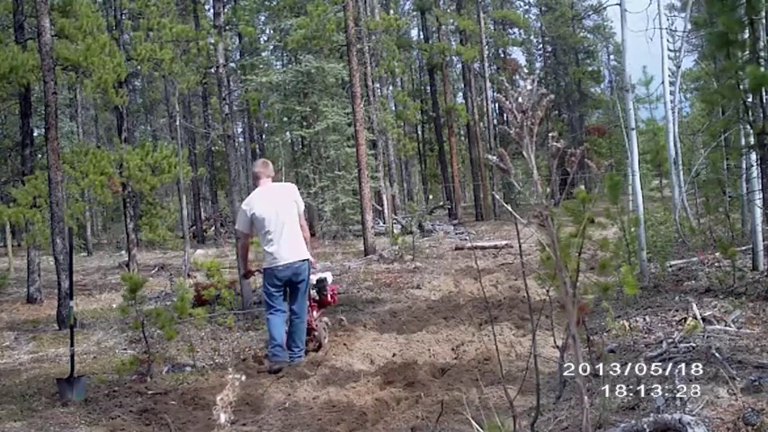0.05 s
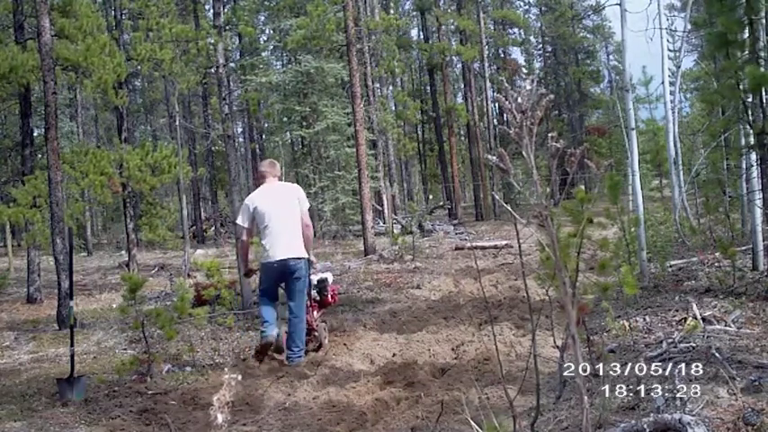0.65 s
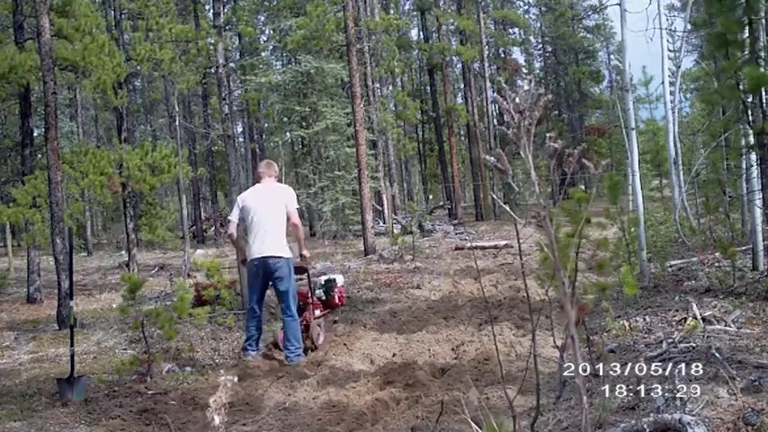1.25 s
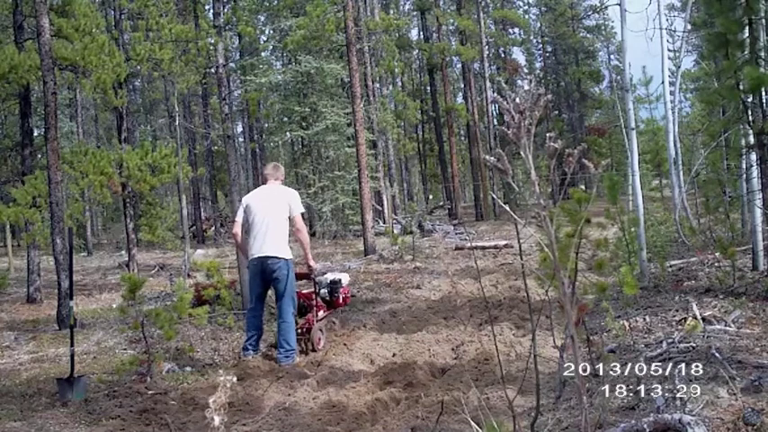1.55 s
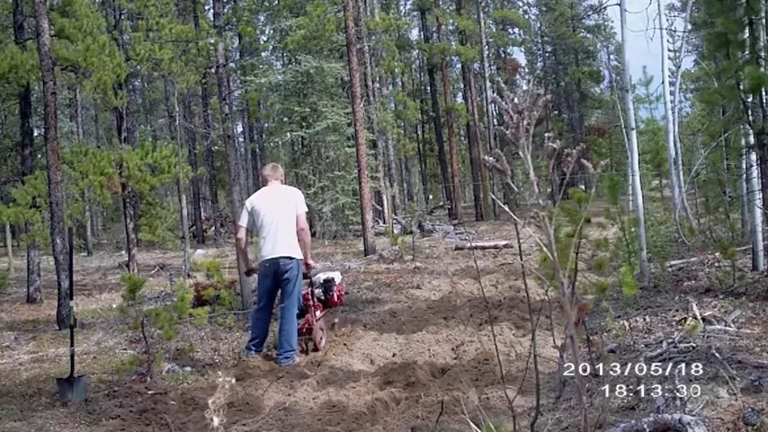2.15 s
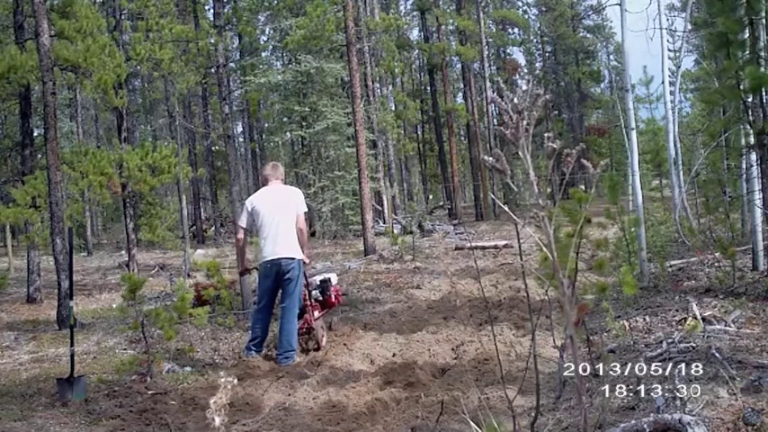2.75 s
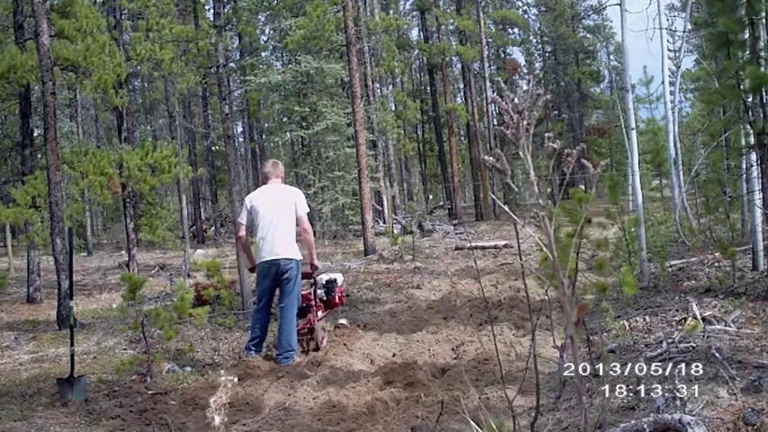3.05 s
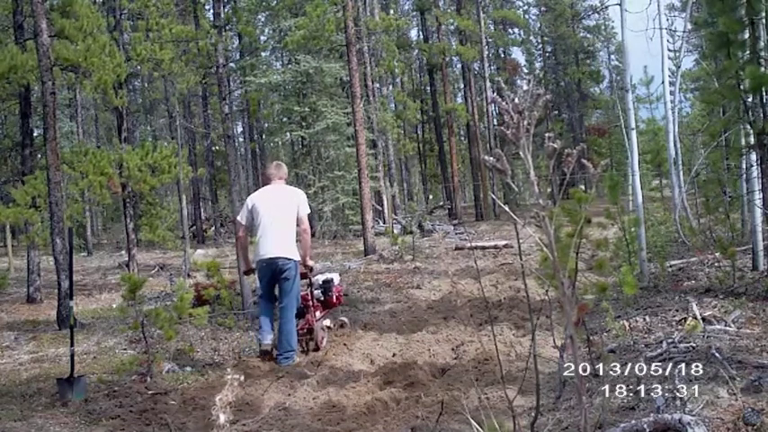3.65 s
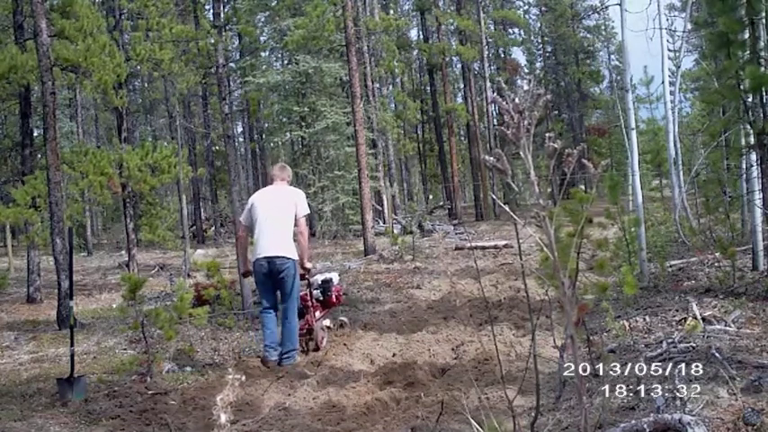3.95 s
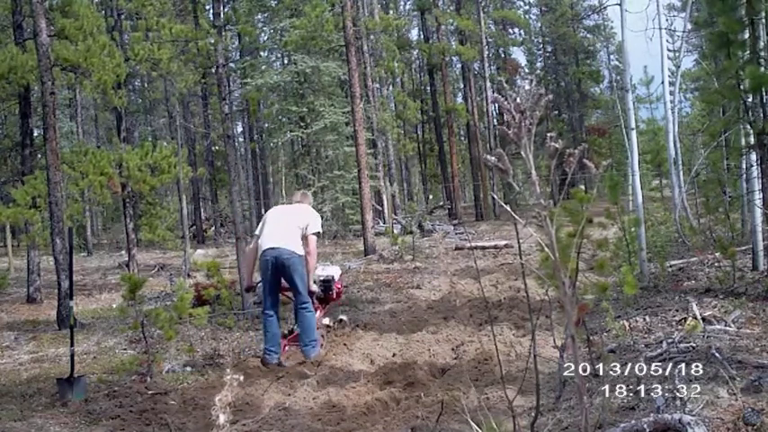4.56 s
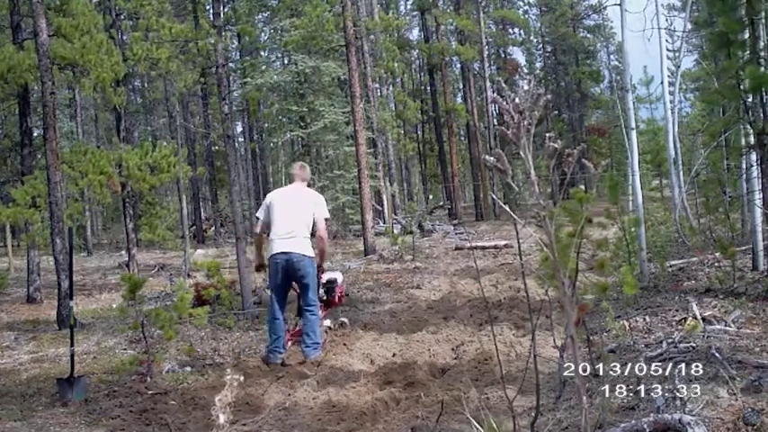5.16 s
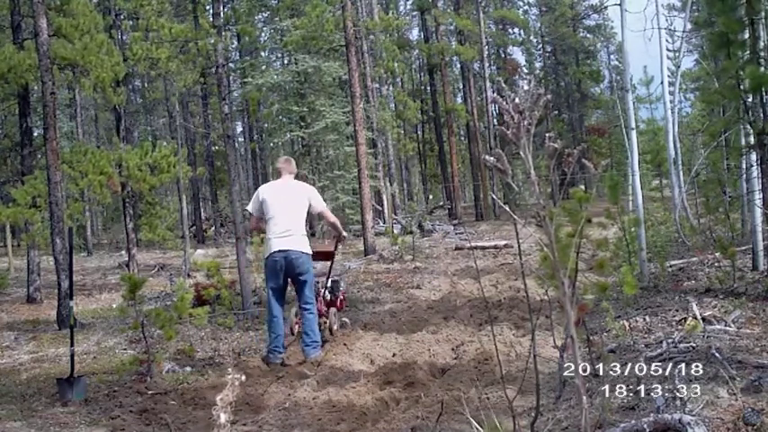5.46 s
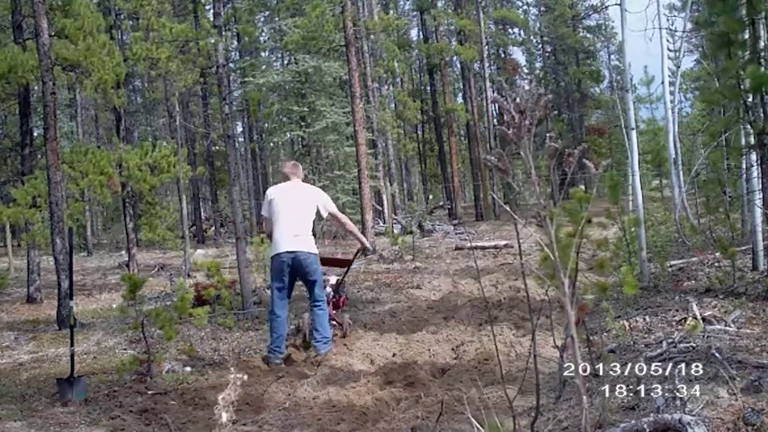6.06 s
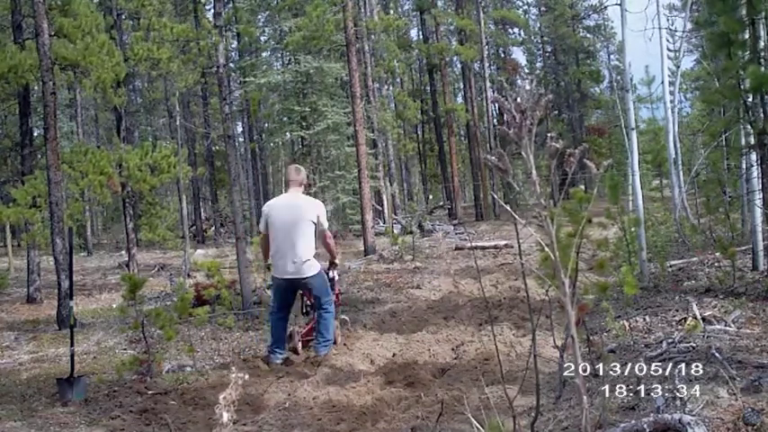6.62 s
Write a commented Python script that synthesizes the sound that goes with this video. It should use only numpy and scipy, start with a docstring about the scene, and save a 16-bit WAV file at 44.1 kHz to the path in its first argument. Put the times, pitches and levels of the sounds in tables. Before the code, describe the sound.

A garden tiller's small petrol engine idles in a forest clearing, its tin guard rattling. After about two seconds it is switched off and coasts down, chuffing and knocking ever slower and softer, with tiny squeaks, dry crackles and a few last gear clacks. A loose metal part clinks faintly. Wind sighs in the pines throughout, and gusts rumble and thump on the microphone before dying down near the end.

```python
"""A garden tiller's single-cylinder four-stroke idles in a forest clearing, its tin guard rattling.
Wind sighs in the pines throughout; from about 1 s gusts buffet the microphone.
At 2.2 s the ignition is cut: friction slows the crank, and the engine knocks and chuffs once a cycle,
ever slower and softer. It squeaks, then crackles as its slack gear clacks to a stop.
At 5.3 s a loose part clinks, and the gusts die down."""
import sys
import numpy as np
from scipy import signal
from scipy.fft import rfft, irfft, next_fast_len
from scipy.io import wavfile
from scipy.ndimage import uniform_filter1d, map_coordinates

SR = 44100
rng = np.random.default_rng(int(sys.argv[2]) if len(sys.argv) > 2 else 0)


def generate_wav(signal):
    """Clip the signal to [-1, 1] and save it as 16-bit WAV at the path in sys.argv[1]."""
    frames = np.transpose(np.atleast_2d(signal))
    scaled = np.clip(frames, -1, 1) * 32767
    pcm = np.round(scaled).astype(np.int16)
    wavfile.write(sys.argv[1], SR, pcm)


N = 299439
TIME = np.arange(N) / SR
IGNITION_OFF_S = 2.21
COAST_S, COAST_HZ = 2.2431, 29.857  # first chuff; engine speeds in Hz count cycles
AIR_BOX_HZ, AIR_BOX_WIDTH_HZ = 335.8, 31
# casing modes: (frequency [Hz], width [Hz], gain [dB])
CASING = [(1116, 120, 7), (1750, 240, 2.5), (2050, 310, 5.5), (2396, 250, 7), (3280, 360, -16),
          (5470, 370, -7.5), (9100, 1000, -19.5)]


def firings(turns):
    """Each firing: exhaust beat in the muffler, sharp tick, gulp through the air box, frame hum."""
    # firing strength: (time [s], level [dB])
    effort = [(0, -24.5), (.6, -24), (1.1, -24.5), (1.4, -25), (1.8, -24), (2.2, -24.5)]
    at = firing_times(turns)
    scatter = rng.standard_normal((len(at), 3))
    db = np.interp(at, *np.transpose(effort))
    exhaust = puffs(at + .00036, db - .9 + .3 * scatter[:, 0], soft_s=.00104, hz=280, width_hz=215)
    intake = -puffs(at + .01026, db - 3.9 + .3 * scatter[:, 1], soft_s=.00159, hz=338, width_hz=30)
    tick = puffs(at - .0002, db - 16 + 2 * scatter[:, 2], soft_s=.00015, hz=1320, width_hz=1900)
    hoot = -puffs(at + .00939, db - 30, soft_s=.00017, hz=AIR_BOX_HZ, width_hz=AIR_BOX_WIDTH_HZ)
    frame_hum = puffs(at, db - 16, soft_s=.001, hz=180.2, width_hz=11.4)
    chambers = -muffler(at + .00862, db - 14.5 + .5 * scatter[:, 1])
    return exhaust + intake + tick + hoot + frame_hum + chambers


def coasting():
    """Unfired, the piston only pumps: soft push, boom, sharp suck at the muffler, air box hoot."""
    at, speed_hz = chuff_cycles()
    slowed = halvings(speed_hz)
    held_back = np.exp(-(at - at[0]) / .18)  # pumping takes time to build up
    push_at = at - .215 / speed_hz
    push = puffs(push_at, -26.5 - 6.8 * slowed, soft_s=.0011, hz=170, width_hz=260)
    stir_db = -43.5 - slowed - 28 * held_back
    stir = puffs(push_at, stir_db, soft_s=.0008, hz=AIR_BOX_HZ, width_hz=AIR_BOX_WIDTH_HZ)
    boom = -puffs(at - .054 / speed_hz, -22 - 16.5 * slowed, soft_s=.0009, hz=101, width_hz=270)
    leak_db = 47 * np.maximum(halvings(speed_hz, from_hz=14.1), 0)  # vacuum leaks away at low speed
    suck_db = -16.5 - 22 * slowed - 13 * held_back - leak_db
    suck = -puffs(at, suck_db + 8.5, soft_s=.0003, hz=68.4, width_hz=180) - muffler(at, suck_db)
    outlet = signal.butter(4, 800, fs=SR, output="sos")
    suck = signal.sosfiltfilt(outlet, suck)
    draw_db = -16 - 22 * slowed - 30.6 * held_back
    gulp = -puffs(at + .267 / speed_hz, draw_db - .5, soft_s=.00028, hz=106, width_hz=83)
    hoot = -puffs(at + .2793 / speed_hz, draw_db, soft_s=.00073, hz=AIR_BOX_HZ, width_hz=AIR_BOX_WIDTH_HZ)
    chuff = push + boom + suck + gulp
    # the first chuffs lack a band and sound hollow
    missing_band = np.interp(TIME, [2.37, 2.45], [1, 0]) * resonance(chuff, hz=262, width_hz=55)
    return chuff - missing_band + stir + hoot


def muffler(at, db):
    """A sharp pressure change rings the chambers, slightly differently each time."""
    # chamber and outlet modes: (frequency [Hz], width [Hz], gain [dB])
    modes = [(472, 26, -12.5), (510, 60, -16.5), (609, 78, -7.5), (646, 36, -14), (694, 23, -14.5)]
    scatter_db = .5 * rng.standard_normal((len(at), len(modes)))
    return sum(puffs(at, db + gain_db + scatter_db[:, k], soft_s=.00026, hz=hz, width_hz=width_hz)
               for k, (hz, width_hz, gain_db) in enumerate(modes))


def clatter(turns):
    """Gear and cam contacts repeat through pulsing noise at idle; coasting, fluttering noise fades."""
    # clatter at full speed: (time [s], body [dB], hiss [dB])
    levels = [(0, -46, -52.5), (1.05, -44.5, -52.5), (1.35, -44, -49.5), (1.6, -41.5, -49),
              (2.03, -45.5, -51.5), (2.2, -44.5, -50.5), (2.4, -47.5, -50), (2.8, -49.5, -44.5)]
    # idle spectrum: (frequency [Hz], density [dB])
    idle_spectrum = [(300, 4), (400, -9), (480, 4), (660, -10.5), (800, -7), (1050, 0), (1350, -1),
                     (1750, 0), (2200, -3), (3000, -8.5), (3500, -14), (5200, -14.5), (7300, -20.5),
                     (8400, -17.5), (9800, -20), (14000, -43)]
    # coasting spectrum: (frequency [Hz], density [dB])
    coast_spectrum = [(300, -6.5), (750, -7.5), (1050, -5), (1600, 3.5), (2300, 0), (3000, -3),
                      (4000, -13.5), (6000, -14.5), (7500, -21.5), (9700, -21), (11500, -38), (14000, -44)]
    gears = contacts(2 * turns, count=735)  # two crank turns a cycle
    cam = contacts(turns, count=1470)
    idle = colour(from_db(-6.5) * rms_one(gears + cam) + rng.standard_normal(N), idle_spectrum)
    # swells after the exhaust beat, less on each half turn of the crank
    pulse_db = 1.2 * np.cos(2 * np.pi * (turns - .15)) + .8 * np.cos(8 * np.pi * turns)
    idle *= from_db(pulse_db + .6 * drift(25))
    coast = colour(rng.standard_normal(N), coast_spectrum)
    coast *= from_db(1.9 * drift(45) + .88 * drift(280) - 2.5)
    idle_share = np.interp(TIME, [2.25, 2.6], [1, 0])
    sound = np.sqrt(idle_share) * idle + np.sqrt(1 - idle_share) * coast
    hiss = signal.sosfiltfilt(signal.butter(2, 4000, "high", fs=SR, output="sos"), sound)
    body_db, hiss_db = in_time(levels)
    slowed = halvings(coast_speed_hz())
    return (sound - hiss) * from_db(body_db + 1 - 4 * slowed) + hiss * from_db(hiss_db + 8.5 - 8.5 * slowed)


def knocks():
    """The valves knock shut hard before some chuffs: scrape, clack, crack, casing ring, rattle."""
    # hard valve knocks: (time [s], clack [dB], pitch [Hz], crack [dB])
    hard_knocks = [(2.259, -39, 1830, -46), (2.3062, -38, 2180, -38), (2.3429, -37, 2110, -41),
                   (2.38, -34, 2150, -40), (2.4157, -43, 1750, -46), (2.4578, -32, 2010, -45),
                   (2.4984, -39, 2340, -44), (2.582, -36, 1870, -40), (2.6259, -33, 2100, -41),
                   (2.6725, -38, 1870, -44), (2.7193, -34, 1960, -48), (2.7671, -33.5, 2330, -38),
                   (2.82, -41, 2120, -42), (2.8723, -35.5, 2170, -53), (2.9297, -34.5, 2270, -52),
                   (2.9867, -47, 2400, -42), (3.049, -38, 2030, -49), (3.1153, -35, 2140, -52),
                   (3.1827, -45, 2030, -44), (3.2547, -38, 2470, -53), (3.335, -38, 1830, -48)]
    at, db, _, crack_db = np.transpose(hard_knocks)
    clack = sum(puffs([s], [clack_db], soft_s=.00002, hz=hz, width_hz=210) for s, clack_db, hz, _ in hard_knocks)
    ring = np.zeros(N)
    for k, (hz, width_hz, gain_db) in enumerate(CASING):
        ring_db = db - 15 + gain_db + rng.normal(0, 1.7, len(at))
        ring += (-1) ** k * puffs(at + .001216, ring_db, soft_s=.00002, hz=hz, width_hz=width_hz)
    scrape = bursts(at - .0035, db - 14, decay_s=.0033)
    tail = bursts(at + .0053, db - 8, decay_s=.0092)
    rattle = resonance(scrape + tail, hz=2500, width_hz=1700)
    crack = resonance(bursts(at + .001, crack_db + 3, decay_s=.0027), hz=5000, width_hz=6000)
    return clack + ring + signal.sosfilt(signal.butter(2, 8000, fs=SR, output="sos"), crack + rattle)


def valve_gear():
    """Valves scuff shut before each chuff and slack gear clacks in the last turns; both ring the casing."""
    # gear clacks: (time [s], level [dB])
    clacks = [(3.3828, -49), (3.4666, -49), (3.5774, -42), (3.592, -47), (3.6497, -44), (3.6866, -40),
              (3.7914, -43), (3.8112, -47), (3.9045, -41), (3.9277, -47), (4.036, -42), (4.0603, -43),
              (4.2369, -46), (4.3756, -43.5), (4.44, -49), (4.5911, -51)]
    clack_at, clack_db = np.transpose(clacks)
    at, speed_hz = chuff_cycles()
    valve_db = -34.5 - 20 * np.maximum(halvings(speed_hz, from_hz=11.3), 0)
    hits = bursts(at - .12 / speed_hz, valve_db + rng.normal(0, 1, len(at)), decay_s=.0047)
    hits += bursts(clack_at, clack_db + 2.5, decay_s=.014)
    hits += bursts(rng.uniform(3.35, 6, size=12), db=-51, decay_s=.027)
    return sum((-1) ** k * from_db(gain_db) * resonance(hits, hz, width_hz)
               for k, (hz, width_hz, gain_db) in enumerate(CASING))


def covers(turns):
    """The piston pushes and pulls on alternate crank turns: a cover rings on odd orders; the shroud drones."""
    # sheet metal vibration: (time [s], cover [dB], shroud [dB])
    shake = [(0, -86, -55), (.6, -63, -58.5), (.95, -57, -54), (1.08, -61, -68), (1.25, -52.5, -70),
             (1.45, -59, -48.5), (1.57, -61, -62), (1.8, -64, -52), (2.02, -66, -60), (2.12, -53, -73),
             (2.28, -56, -51), (2.45, -62, -58), (3, -76, -73), (3.6, -100, -100)]
    # shroud modes: (frequency [Hz], width [Hz], gain [dB])
    modes = [(1029, 43, -2), (1725, 30, -4), (2110, 18, 0)]
    cover_hz, cover_width_hz = 1305, 66
    cover_db, shroud_db = in_time(shake)
    shoves = np.diff(np.floor(2 * turns) % 2, prepend=0) * from_db(2.3 * rng.standard_normal(N))
    cover = resonance(resonance(shoves, cover_hz, cover_width_hz), cover_hz, 3 * cover_width_hz)
    beats = np.diff(np.floor(turns), prepend=0) * from_db(2.8 * rng.standard_normal(N))
    shroud = sum(from_db(gain_db) * resonance(resonance(beats, hz, width_hz), hz, 3 * width_hz)
                 for hz, width_hz, gain_db in modes)
    return from_db(cover_db) * rms_one(cover) + from_db(shroud_db) * rms_one(shroud)


def guard(turns):
    """A loose tin guard ticks and bounces on every firing, now and then hard."""
    # steady rattle: (time [s], level [dB])
    rattle = [(0, -72), (1.0, -70), (1.35, -57), (1.7, -58), (2.0, -56), (2.2, -56)]
    # hard ticks: (time [s], level [dB])
    hard_ticks = [(1.228, -52), (1.262, -50), (1.355, -45), (1.389, -46), (1.424, -48), (1.493, -43),
                  (1.526, -50), (1.560, -43.5), (1.594, -43), (1.693, -48), (1.727, -49)]
    # tin modes: (frequency [Hz], width [Hz], gain [dB])
    modes = [(1180, 140, 9), (1480, 170, 4), (2180, 210, -20), (5170, 180, 2.5), (5660, 400, -14)]
    at = firing_times(turns)
    scatter = rng.standard_normal((len(at), 4))
    rattle_db = np.interp(at, *np.transpose(rattle))
    hard_at, hard_db = np.transpose(hard_ticks)
    tick_at, tick_db = at + .002 + .0015 * scatter[:, 0], rattle_db + 2 * scatter[:, 2]
    bounce_at, bounce_db = at + .011 + .0022 * scatter[:, 1], rattle_db + 4 + 2 * scatter[:, 3]
    times = np.concatenate([hard_at, tick_at, bounce_at])
    db = np.concatenate([hard_db, tick_db, bounce_db])
    return sum(puffs(times, db + gain_db + rng.normal(0, 1.3, len(db)), .00002, hz, width_hz)
               for hz, width_hz, gain_db in modes)


def squeaks():
    """A rubbing part slips in short, rough, rising chirps."""
    # slips: (time [s], peak [dB])
    slips = [(3.127, -51), (3.198, -46.5), (3.272, -48)]
    out = np.zeros(N)
    for s, db in slips:
        hz = 3170 + 7000 * np.clip(TIME - s, -.05, .05) + 260 * drift(600)
        envelope = from_db(db) * np.exp(-.5 * ((TIME - s) / .0049) ** 2)
        out += envelope * np.sin(2 * np.pi * np.cumsum(hz) / SR)
    return out


def crackles():
    """Dry, grainy crackles swell briefly and give in the last cycles."""
    # crackles: (time [s], level [dB])
    events = [(3.6865, -51), (3.722, -51), (3.8344, -54), (4.0841, -49), (4.1061, -45), (4.15, -57),
              (4.2594, -54), (4.4494, -59), (4.7082, -58)]
    at, db = np.transpose(events)
    envelope = swells(at, db - 6, decay_s=.0076, rise_samples=350)
    grains = colour(rng.standard_normal(N), [(3000, 0), (6000, 1.5), (10000, 4), (11500, -13), (14000, -15)])
    return envelope * grains * from_db(2 * drift(250))


def clink():
    """A loose steel part grazes as the handle is moved, rings, and touches again lightly."""
    at_s, peak_db, hz = 5.269, -47.5, 2410
    touches = bursts([at_s, at_s + .024], db=[0, -9], decay_s=.012)
    ring = resonance(resonance(touches, hz, width_hz=70), hz, width_hz=220)
    return from_db(peak_db) * ring / np.abs(ring).max()


def buffeting():
    """Wind on the microphone: slow rumble, eddies that grow faster than the gust, single thumps."""
    # breeze: (time [s], level [dB])
    breeze = [(0, -48), (.5, -59), (1.1, -43.5), (2.0, -37.5), (3.0, -45.5), (4.4, -43), (5.65, -51.5),
              (5.8, -60), (6.79, -58.5)]
    # gusts on top: (time [s], level [dB], half-length [s])
    gusts = [(1.35, -33, 0.08), (1.6, -29.5, 0.081), (1.887, -30.5, 0.026), (2.402, -32.5, 0.046),
             (2.63, -40.5, .09), (3.173, -35, 0.045), (3.295, -35, 0.03), (3.666, -34, 0.036),
             (3.862, -45, 0.06), (4.188, -30.5, 0.044), (4.53, -41, 0.03), (4.79, -37.5, 0.04),
             (4.944, -38.5, 0.066), (5.29, -50, 0.075), (5.422, -41, 0.028)]
    # rumble spectrum: (frequency [Hz], density [dB])
    rumble_spectrum = [(14, 6), (30, -5.5), (55, -7), (100, -16.5), (200, -26.5)]
    # eddy spectrum: (frequency [Hz], density [dB])
    eddy_spectrum = [(45, -6.5), (80, -5.5), (140, -19), (220, -20), (400, -32)]
    # single wind thumps on the microphone: (time [s], peak [dB], pitch [Hz])
    wind_hits = [(1.317, -17, 104), (1.572, -42, 35), (1.607, -27, 60), (1.696, -23.5, 113),
                 (1.872, -24.5, 27.7), (1.895, -36, 70), (2.025, -28, 35), (2.383, -21, 44.7),
                 (2.424, -26, 106), (2.555, -33, 35), (3.125, -32, 95), (3.197, -32, 34.5),
                 (3.27, -28.5, 55.4), (3.604, -36.5, 131), (3.632, -30, 136), (3.671, -28, 63),
                 (3.699, -30, 32), (3.747, -33, 115), (3.88, -36, 80), (4.009, -37.5, 90), (4.136, -32, 55),
                 (4.176, -20, 147), (4.246, -28.5, 112), (4.421, -33, 23.8), (4.522, -37, 85),
                 (4.544, -35, 27.4), (4.631, -33.5, 85), (4.752, -34, 48), (4.83, -33, 44.6),
                 (4.891, -36, 90), (4.915, -31, 64.6), (4.985, -31.5, 28.1), (5.022, -40, 85),
                 (5.11, -36, 88), (5.295, -34.5, 23.9), (5.39, -47, 70), (5.423, -40, 51.7),
                 (5.539, -47, 55), (5.645, -47, 35), (6.02, -51, 45)]
    gust_power = sum(from_db(db) ** 2 * np.exp(-((TIME - s) / half_s) ** 2) for s, db, half_s in gusts)
    wind_db = 10 * np.log10(from_db(in_time(breeze)[0]) ** 2 + gust_power)
    rumble = from_db(wind_db + 1 + .62 * drift(4.7)) * colour(rng.standard_normal(N), rumble_spectrum)
    eddy_db = 1.423 * wind_db + 1.5 + 3.8 * drift(15)
    eddies = from_db(eddy_db) * colour(rng.standard_normal(N), eddy_spectrum)
    thumps = sum(puffs([s], [db], soft_s=.1 / hz, hz=hz, width_hz=min(hz, 60)) for s, db, hz in wind_hits)
    return rumble + eddies + thumps


def pines():
    """Wind sighs smoothly in the trees."""
    # sigh: (time [s], level [dB])
    sigh = [(0, -50), (4, -49.5), (5.2, -49.5), (5.7, -49), (6.2, -48.5), (6.79, -48)]
    # sigh spectrum: (frequency [Hz], density [dB])
    spectrum = [(24, -39), (40, -14.5), (118, -4.5), (197, -1), (271, -1.5), (363, -3.5), (638, -3),
                (1090, -1.5), (1580, -9.5), (2230, -14.5), (2640, -17), (3060, -19), (7050, -33.5),
                (11800, -45), (14000, -63)]
    return from_db(in_time(sigh)[0] + .15 * drift(4.1)) * colour(rng.standard_normal(N), spectrum)


def forest(x):
    """Trunks add a faint midrange tail of echoes."""
    t, rt60_s = TIME[:SR], .61
    tail = rng.standard_normal(SR) * from_db(-60 * t / rt60_s) * (t > .015)
    tail = resonance(tail, hz=940, width_hz=4000)
    return x + from_db(-15.5) * signal.oaconvolve(x, tail / np.linalg.norm(tail))[:N]


def firing_times(turns):
    """Time [s] of each whole cycle before the ignition is cut."""
    count = int(np.interp(IGNITION_OFF_S, TIME, turns))
    return np.interp(np.arange(1, count + 1), turns, TIME)


def coast_speed_hz():
    """Cycle rate per sample: full until COAST_S, then braked by dry friction and drag."""
    friction_hz_per_s, drag_per_s = 1.571, .7132
    offset_hz = friction_hz_per_s / drag_per_s
    decay = np.exp(-drag_per_s * np.maximum(TIME - COAST_S, 0))
    return np.maximum((COAST_HZ + offset_hz) * decay - offset_hz, 1e-3)


def chuff_cycles():
    """Time [s] and speed [Hz] of each unfired cycle, as the exhaust valve opens and air rushes in."""
    speed_hz = coast_speed_hz()
    cycles = np.cumsum(speed_hz * (TIME >= COAST_S)) / SR
    opens = np.flatnonzero(np.diff(np.ceil(cycles)))
    return TIME[opens], speed_hz[opens]


def halvings(speed_hz, from_hz=COAST_HZ):
    """Octaves of speed below from_hz."""
    return np.log2(from_hz / speed_hz)


def contacts(turns, count):
    """Random pattern that repeats every turn."""
    return rng.standard_normal(count)[(turns * count).astype(int) % count]


def from_db(db):
    """Decibels to gain."""
    return 10 ** (np.asarray(db) / 20)


def rms_one(x):
    """Scale to rms 1."""
    return x / np.sqrt(np.mean(x ** 2) + 1e-20)


def in_time(rows):
    """Each column of a curve at every sample."""
    s, *columns = np.transpose(rows)
    return [np.interp(TIME, s, c) for c in columns]


def colour(x, spectrum):
    """Apply a (frequency [Hz], gain [dB]) curve that falls away beyond its ends; rms 1."""
    hz, db = np.transpose(spectrum)
    size = next_fast_len(N)
    f = np.maximum(np.arange(size // 2 + 1) * SR / size, 1)
    skirts = np.minimum(f / hz[0], 1) ** 2 * np.minimum(hz[-1] / f, 1) ** 2
    gain = skirts * from_db(np.interp(np.log(f), np.log(hz), db))
    return rms_one(irfft(rfft(x, size) * gain, size)[:N])


def drift(rate_hz):
    """Smooth random wander, rms 1."""
    knots = rng.standard_normal(4000)
    return rms_one(map_coordinates(knots, [TIME * rate_hz * 2], order=3, mode="wrap"))


def resonance(x, hz, width_hz):
    """Two-pole resonance, peak gain 1."""
    r = np.exp(-np.pi * width_hz / SR)
    feedback = [1, -2 * r * np.cos(2 * np.pi * hz / SR), r * r]
    return signal.lfilter(np.array([1, 0, -1]) * (1 - r * r) / 2, feedback, x + 1e-18)


def clicks(times, db):
    """One impulse per event."""
    out = np.zeros(N)
    np.add.at(out, np.clip(np.round(np.asarray(times) * SR).astype(int), 0, N - 1), from_db(db))
    return out


def puffs(times, db, soft_s, hz, width_hz):
    """Rounded pushes ring one mode; each peaks at its dB."""
    t = np.arange(-SR // 10, SR // 10 + 1) / SR
    shape = resonance(np.exp(-.5 * (t / soft_s) ** 2), hz, width_hz)
    return signal.oaconvolve(clicks(times, db), shape / np.abs(shape).max(), "same")


def swells(times, db, decay_s, rise_samples):
    """Envelope: short rise and exponential fall per event."""
    fall = signal.lfilter([1], [1, -np.exp(-1 / (decay_s * SR))], clicks(times, db) + 1e-18)
    return uniform_filter1d(fall, size=rise_samples)


def bursts(times, db, decay_s):
    """A decaying noise burst per event."""
    return swells(times, db, decay_s, rise_samples=140) * rng.standard_normal(N)


def scene():
    """The tiller among the trees, and the wind."""
    # idle speed: (time [s], cycle rate [Hz])
    idle_speed = [(0.0, 30.16), (0.25, 30.06), (0.5, 29.903), (0.85, 30.454), (1.1, 29.804), (1.35, 29.199),
                  (1.7, 30.069), (2.0, 29.796), (2.2, 29.38)]
    speed_hz = np.where(TIME < COAST_S, in_time(idle_speed)[0], coast_speed_hz())
    turns = .355 + np.cumsum(speed_hz) / SR  # cam turns, one per engine cycle
    tiller = firings(turns) + coasting() + clatter(turns) + covers(turns) + guard(turns)
    tiller += knocks() + valve_gear() + squeaks() + clink() + crackles()
    return (forest(tiller) + buffeting() + pines())[None]


def record(dry):
    """Narrow treble notch and steep top cut."""
    notch_hz, cutoff_hz = 7880, 14200
    notch = signal.butter(2, [notch_hz - 170, notch_hz + 170], "bandstop", fs=SR, output="sos")
    top = signal.ellip(10, .1, 80, cutoff_hz, fs=SR, output="sos")
    return signal.sosfilt(top, signal.sosfilt(notch, dry))


dry = scene()
out = record(dry)
generate_wav(out)
```